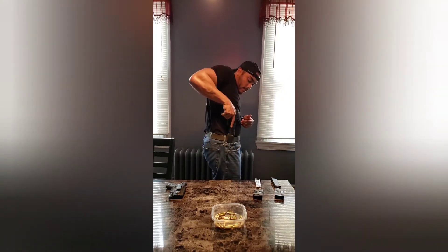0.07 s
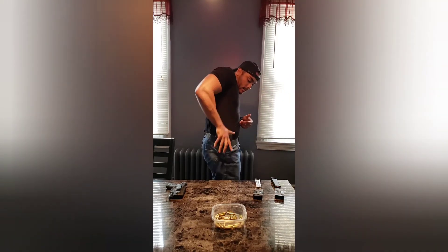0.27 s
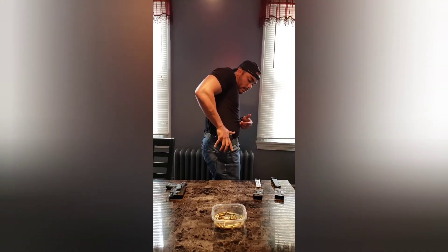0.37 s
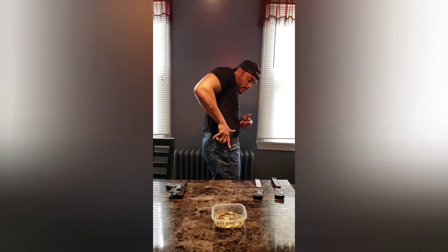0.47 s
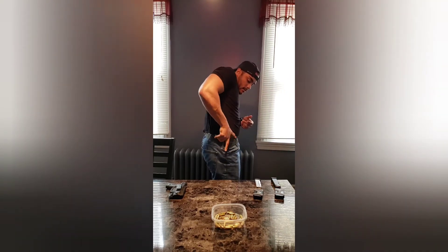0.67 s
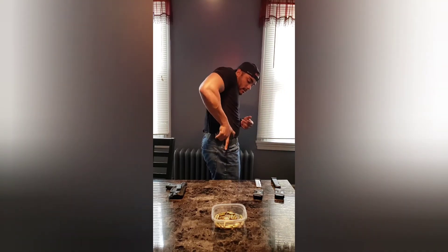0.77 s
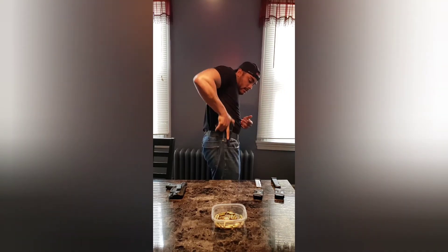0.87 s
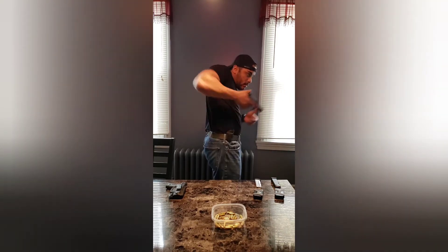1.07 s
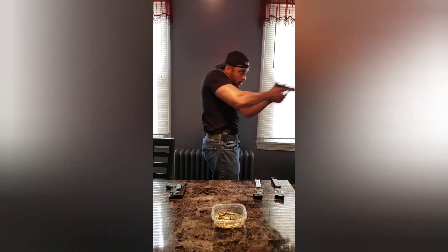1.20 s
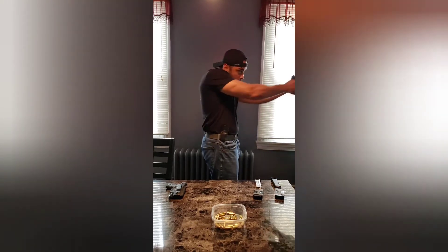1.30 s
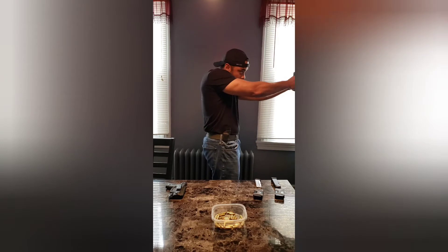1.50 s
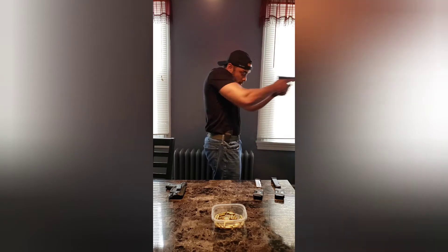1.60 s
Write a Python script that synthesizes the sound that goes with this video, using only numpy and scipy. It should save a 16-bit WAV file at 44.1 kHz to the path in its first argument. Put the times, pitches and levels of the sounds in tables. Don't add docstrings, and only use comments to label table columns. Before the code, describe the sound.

A pistol slides into a stiff belt holster: light rustles and small taps from 0 to 0.2 seconds, then a stronger scrape with clustered hollow knocks, the hardest clack near 0.32. Small ticks fade by 0.5. Near quiet follows until a sharp, brighter scrape and clack of the draw at 0.85 to 1.0. Faint cloth rustles trail off over low hum and hiss in a small reverberant room.

```python
import sys
import numpy as np
from scipy import signal
from scipy.fft import rfft, irfft, next_fast_len
from scipy.io import wavfile

SR = 44100
rng = np.random.default_rng(int(sys.argv[2]) if len(sys.argv) > 2 else 0)


def gain_from_db(level_db):
    decades = np.asarray(level_db, float) / 20
    return 10 ** decades


def unload_audio(sound):
    columns = np.transpose(np.atleast_2d(sound))
    steps = np.round(np.clip(columns, -1, 1) * 32767)
    wavfile.write(sys.argv[1], SR, steps.astype(np.int16))


N = 72765
TIME = np.arange(N) / SR
SIZE = next_fast_len(2 * N)
FREQ = np.maximum(np.arange(SIZE // 2 + 1) * SR / SIZE, 1)

# pitch_hz, level_db (rms)
HUM_LINES = [(59.2, -63.5), (86.1, -79.5), (118.4, -65.5), (204.6, -77.5)]
# time_s, change_db
HUM_LOAD = [
    (0, 0),
    (.4, 3.5),
    (.55, -1.5),
    (.75, -1.5),
    (.9, 2.5),
    (1.65, -1.5),
]
# pitch_hz, level_db (per Hz)
AIR_COLOUR = [(20, -48), (40, -29), (60, -10.5), (128, -9.5), (155, -14.5), (210, -8), (290, -19),
              (520, -24), (1100, -50.5)]
# pitch_hz, level_db (per Hz)
HISS_COLOUR = [(300, 5), (1000, 0), (2600, 0.5), (4000, -4.5), (6800, -19.5), (8600, -37), (10000, -18.5),
               (15500, -1.5)]
# pitch_hz, difference_db
NOISE_PAN = [(60, -11.5), (240, -11), (900, -4.5), (3500, 2), (9000, -3.5), (15000, -0.5)]
# pitch_hz, likeness (0 to 1)
NOISE_ALIKE = [(30, 1), (150, 0.34), (600, 0.6), (2000, 0.017)]
# time_s, pitch_hz, level_db
HOLLOW = [(.21, 1162, -80), (.255, 1150, -40), (0.288, 1111, -35.5), (.308, 1100, -70), (.322, 1100, -42),
          (0.347, 980, -40), (0.384, 1090, -48.5), (0.444, 970, -55.5), (0.549, 1000, -69),
          (0.621, 993.7, -85), (0.869, 1101, -93), (0.898, 1193, -39), (0.939, 1050, -47.5),
          (1.052, 1030, -74)]
# start_s, peak_db, pitch_hz (hollow), crack_db
KNOCKS = [(.005, -47.5, 464, -12), (0.021, -64, 645, -28), (.118, -48, 710, -21), (0.129, -48.5, 626, -16),
          (.188, -42.5, 945, -3), (.205, -43, 1734, -23.5), (.246, -35, 790, 7), (.253, -34, 1275, -14),
          (0.269, -38, 765, -19), (.271, -33.5, 2000, -27), (0.276, -34.5, 1184, -13),
          (0.288, -39, 1353, -9), (0.3197, -29, 1028, 7), (0.3281, -29.5, 909, 2.5),
          (.334, -34.5, 1220, -28), (.402, -40.5, 1195, -9), (.472, -44.5, 664, -17), (.485, -50, 498, -20),
          (.51, -49.5, 681, -27), (0.884, -36.5, 1006, -24), (0.897, -30, 1210, -17), (.903, -37, 1499, -2),
          (0.915, -37, 910, -17.5), (.953, -31.5, 427, -10), (.967, -32.5, 584, -20), (.985, -38, 354, -24)]
# multiple (of the hollow pitch), level_db, t60_s (time to fade by 60 dB)
SHELL_MODES = [(.27, -13, 0.026), (.45, -18, 0.0068), (.62, -8.5, 0.045), (1.0, 1, 0.025),
               (1.25, -2, 0.019), (1.8, -15.5, 0.038), (2.25, 0.5, 0.005), (3.0, -7, 0.006)]
# start_s, rise_s, hold_s, level_db, brightness_db (per octave)
STROKES = [(-.03, 0.0055, 0.036, -52.5, -3.5), (0.018, 0.022, 0.031, -67, -2.5),
           (0.077, 0.04, 0.047, -59, -1), (0.138, 0.055, 0.1, -49.5, 0), (.215, .045, 0.032, -35.5, 0),
           (0.302, 0.015, 0.037, -39, -2), (.37, 0.022, 0.019, -56, 2), (0.452, 0.0089, .05, -64, -2.5),
           (0.519, 0.023, 0.096, -70, -1.5), (0.615, 0.049, 0.057, -71, 6.5),
           (0.778, 0.027, 0.028, -76.5, -1), (.855, 0.045, 0.028, -38, 1.5), (0.918, 0.037, 0.055, -45, 3),
           (1.005, 0.018, 0.056, -61.5, 0), (1.108, .02, 0.039, -75, 5), (1.166, 0.023, 0.061, -67, 3),
           (1.264, 0.021, 0.076, -77.5, 4)]
# pitch_hz, level_db (per Hz)
RUB_COLOUR = [(120, -21.5), (240, -5.5), (450, -5.5), (1100, -3), (2000, -7.5), (3500, -12), (6000, -16),
              (15000, -23)]
# pitch_hz, gain_db
LEFT_PORT = [(100, -7), (500, -5), (1500, -6.5), (5000, -10.5), (8300, -14.5), (9800, -3), (13000, -9),
             (15700, -30.5)]
RIGHT_PORT = [(100, -1.5), (5000, 9), (6500, 3), (7600, -11.5), (8700, -12), (9400, -14), (12000, 1),
              (16000, -1)]


def rms_one(x):
    return x / np.sqrt(np.mean(x ** 2) + 1e-20)


def at_hz(points):
    hz, value = np.transpose(points)
    return np.interp(np.log(FREQ), np.log(np.maximum(hz, 1)), value)


def colour(x, gain):
    return irfft(rfft(x, SIZE) * gain, SIZE)[..., :N]


def drift(rate_hz):
    r = np.exp(-2 * np.pi * rate_hz / SR)
    sway = signal.lfilter([1], [1, -2 * r, r * r], rng.standard_normal(2 * N))
    return rms_one(sway[N:])


def pair_of(mid, side, alike):
    shared = np.sqrt(1 + alike) * mid
    opposed = np.sqrt(1 - alike) * side * [[1], [-1]]
    return (shared + opposed) / np.sqrt(2)


def hum():
    wobble_db, pan_db = 1.2, -3
    lines = 0
    for hz, level_db in HUM_LINES:
        level = np.sqrt(2) * gain_from_db(level_db + wobble_db * drift(6.3))
        lines = lines + level * np.sin(2 * np.pi * hz * TIME + drift(6.2) / 2)
    load = gain_from_db(np.interp(TIME, *np.transpose(HUM_LOAD)))
    return lines * load * gain_from_db([[pan_db / 2], [-pan_db / 2]])


def steady_noise(spectrum, level_db):
    mid, side = rfft(rng.standard_normal((2, N)), SIZE)
    alike = np.clip(at_hz(NOISE_ALIKE), 0, 1)
    pan_db = at_hz(NOISE_PAN) / 2
    gain = gain_from_db(at_hz(spectrum) + np.array([pan_db, -pan_db]))
    pair = pair_of(mid, side, alike) * gain
    return gain_from_db(level_db) * rms_one(irfft(pair, SIZE)[:, :N])


def hollow():
    width_hz, wander_hz, flutter_db = 59.4, 44.9, 3
    s, hz, level_db = np.transpose(HOLLOW)
    pitch_hz = np.interp(TIME, s, hz) + wander_hz * drift(width_hz)
    loudness_db = np.interp(TIME, s, level_db, left=-120, right=-120) + flutter_db * drift(width_hz)
    return np.sin(2 * np.pi * np.cumsum(pitch_hz) / SR) * gain_from_db(loudness_db)


def knocks():
    crack_hz, contact_s, vary_db = 2010, 0.00089, 2
    out = np.zeros(N + SR)
    t = np.arange(SR // 8) / SR
    contact = 1 - np.exp(-t / contact_s)
    click = np.sin(2 * np.pi * crack_hz * t) * np.exp(-2 * crack_hz * t)
    chance = rng.standard_normal((len(KNOCKS), len(SHELL_MODES)))
    for (start, peak_db, hz, crack_db), vary in zip(KNOCKS, chance):
        ring = 0
        for (multiple, level_db, t60), v in zip(SHELL_MODES, vary):
            fade = gain_from_db(level_db + vary_db * v - 60 * t / t60)
            ring = ring + fade * np.sin(2 * np.pi * hz * multiple * t)
        i = int(start * SR)
        out[i:i + len(t)] += gain_from_db(peak_db + 2) * (ring * contact + gain_from_db(crack_db) * click)
    return out[:N]


def rubbing():
    slips_per_s, slip_spread_db, smooth_share = 2500, 3, 0.55
    judder_db, judder_hz = 0.5, 40.4
    rise_range_db, release_db_per_s = 27, 385
    alike_below_hz = 438

    size_db = slip_spread_db * np.minimum(rng.exponential(1, (2, N)), 4)
    sizes = gain_from_db(size_db) * rng.choice([-1, 1], (2, N))
    slips = rms_one(sizes * (rng.random((2, N)) < slips_per_s / SR))
    cloth = rng.standard_normal((2, N))
    grain = smooth_share * cloth + (1 - smooth_share) * slips
    grain = grain * gain_from_db(judder_db * drift(judder_hz))
    spread = pair_of(*rfft(grain, SIZE), 1 / (1 + (FREQ / alike_below_hz) ** 2))
    out = 0
    for start, rise, hold, level_db, bright_db in STROKES:
        t = TIME - start
        swell_db = rise_range_db * (t / rise - 1)
        release_db = -release_db_per_s * (t - rise - hold)
        shape_db = np.clip(np.minimum(swell_db, release_db), -90, 0)
        gain = gain_from_db(at_hz(RUB_COLOUR) + bright_db * np.log2(FREQ / 1000))
        rub = rms_one(irfft(spread * gain, SIZE)[:, :N])
        out = out + rub * gain_from_db(level_db + shape_db)
    return out


def room(x):
    tail_db, t60_s, treble_t60_s, split_hz, gap_s = -5, 0.46, 0.35, 5000, 0.0083
    left_db, left_lag_s, alike_below_hz = 1, .0001, 253

    noise = rng.standard_normal((2, 2, N))
    late = np.maximum(TIME - gap_s, 0)
    onset = 1 - np.exp(-late / gap_s)
    low = 1 / np.sqrt(1 + (FREQ / split_hz) ** 2)
    bass = rfft(noise[0] * onset * gain_from_db(-60 * late / t60_s), SIZE) * low
    treble = rfft(noise[1] * onset * gain_from_db(-60 * late / treble_t60_s), SIZE) * np.sqrt(1 - low ** 2)
    mid, side = bass + treble
    tail = pair_of(mid, side, 1 / (1 + (FREQ / alike_below_hz) ** 2))
    tail = tail / np.sqrt(SR * t60_s / np.log(1e6))
    left = gain_from_db(left_db) * np.exp(-2j * np.pi * FREQ * left_lag_s)
    direct = np.array([left, np.ones(len(FREQ))])
    return colour(x, direct + gain_from_db(tail_db) * tail)


def scene():
    background = hum() + steady_noise(AIR_COLOUR, -63.5) + steady_noise(HISS_COLOUR, -72.5)
    handling = room(hollow() + knocks() + rubbing())
    ports = gain_from_db(np.array([at_hz(LEFT_PORT), at_hz(RIGHT_PORT)]))
    return background + colour(handling, ports)


def top_cut(x):
    return signal.sosfilt(signal.butter(12, 15950, fs=SR, output="sos"), x)


def record(dry):
    notch_hz, width_hz, notch_db = 8150, 700, -4
    dip_db = notch_db * np.exp(-((FREQ - notch_hz) / width_hz) ** 2)
    return top_cut(colour(dry, gain_from_db(dip_db)))


dry = scene()
out = record(dry)
unload_audio(out)
```